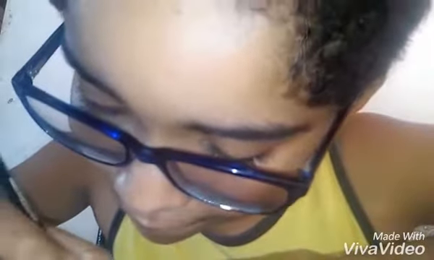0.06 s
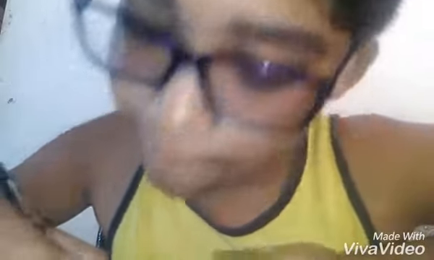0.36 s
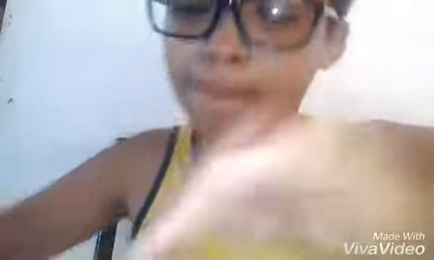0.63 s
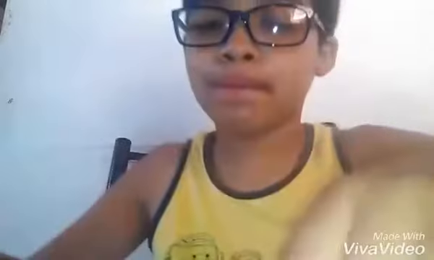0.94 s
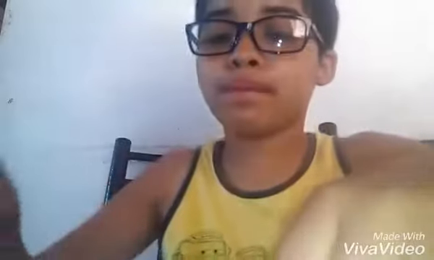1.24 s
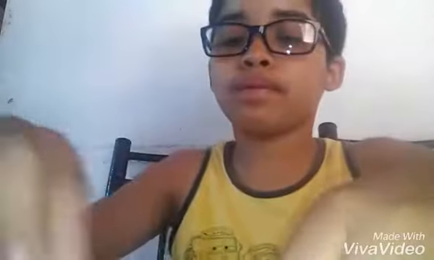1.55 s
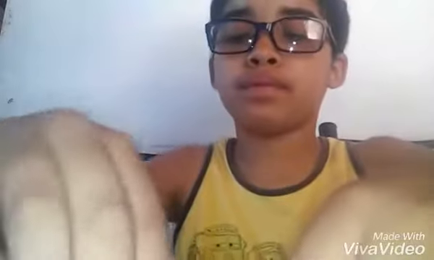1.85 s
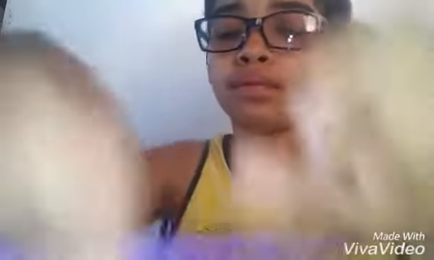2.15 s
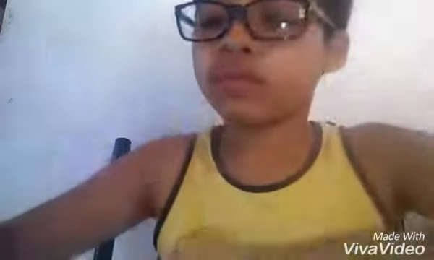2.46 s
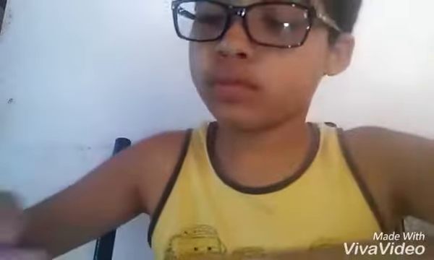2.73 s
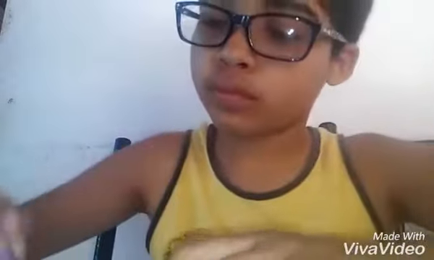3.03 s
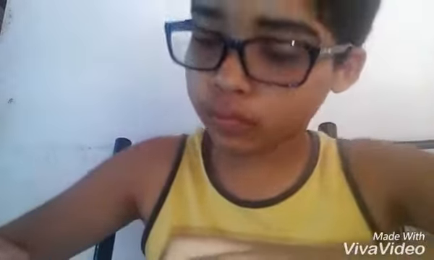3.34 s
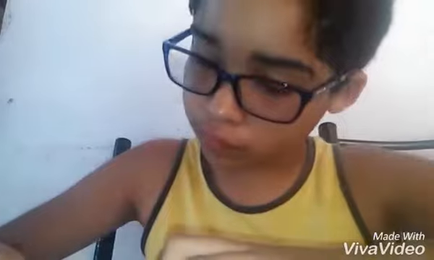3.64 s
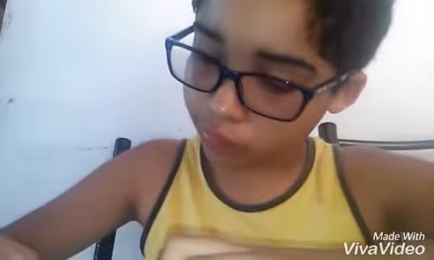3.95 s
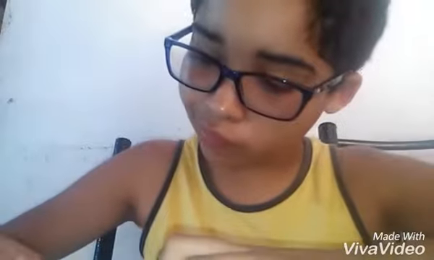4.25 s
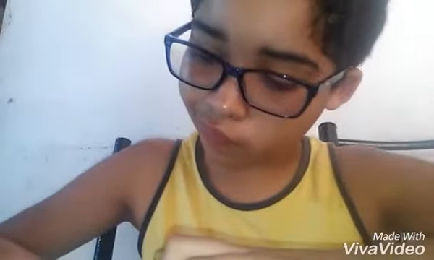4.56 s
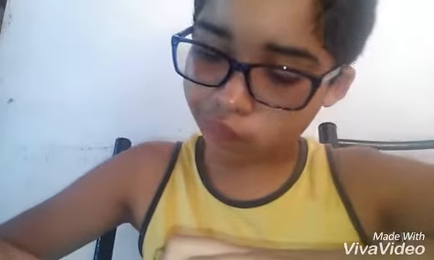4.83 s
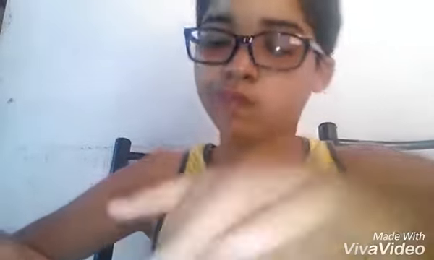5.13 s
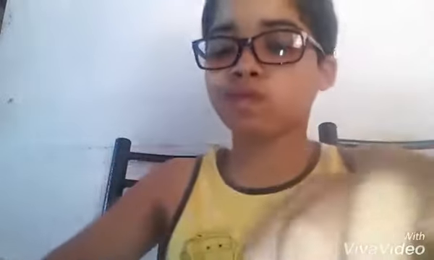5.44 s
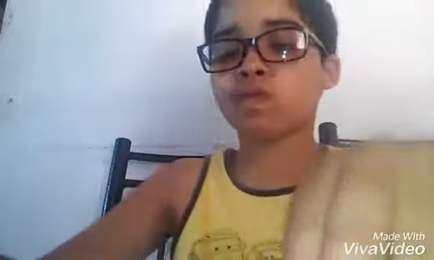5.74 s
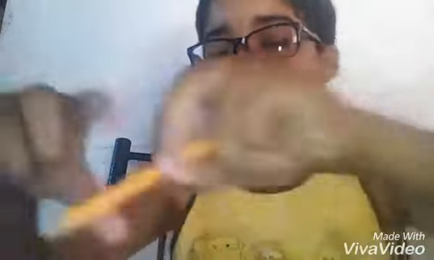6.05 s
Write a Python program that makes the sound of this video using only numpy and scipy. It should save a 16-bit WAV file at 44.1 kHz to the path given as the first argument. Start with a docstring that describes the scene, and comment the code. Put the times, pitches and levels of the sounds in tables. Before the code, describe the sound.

A small, quiet room with soft hiss and a faint electrical hum, heard from close by. For the first 0.6 seconds a fine pen tip shades paper in six quick, very faint strokes. Around 1.1 to 1.3 seconds pen barrels click against each other and the table, ending in a thin tink. Single light clicks follow at about 1.6 and 2.2 seconds. After a brief scuff and paper swish, just before 3 seconds, a pen is knocked down hard on the wooden top: a sharp, rattling crack with a low thump, far louder than anything else. It skids coarsely over the sheet, clicks at 3.1 seconds and settles. From about 3.9 to 4.7 seconds a broad tip scribbles softly to and fro four times. Small scuffs cluster around 5 seconds, then fingers tick faintly on a pen, with two light clicks near 6.3 seconds.

```python
"""Colouring pens on a table

A small, quiet room with soft hiss and a faint mains hum. Pen barrels and caps click and tink,
and tips rub over the paper fibres, first in quick shading, later in a to-and-fro scribble.
Near 3 s one pen is knocked down hard, thumps the wooden top and skids over the sheet."""
import sys
import numpy as np
from scipy import signal
from scipy.fft import rfft, irfft, next_fast_len
from scipy.io import wavfile

SR = 44100
rng = np.random.default_rng(int(sys.argv[2]) if len(sys.argv) > 2 else 0)


def transcribe(u):
    """Save the signal u as a 16-bit wav file named by the first command-line argument.

    u: samples, shape (n,) or (channels, n), limited to [-1, 1]; the rate is SR.
    q: integer samples, one column per channel.
    """
    v = np.clip(np.atleast_2d(u).T, -1, 1)
    q = np.round(v * 32767).astype(np.int16)
    wavfile.write(sys.argv[1], SR, q)


N = 277389
T = np.arange(N) / SR
HIT_T = T[:SR // 2]  # time axis of a one-shot


def from_db(db):
    """Decibels to gain."""
    return 10 ** (np.asarray(db) / 20)


def unit_rms(x):
    """Normalise to an rms of 1."""
    return x / np.sqrt(np.mean(x ** 2) + 1e-20)


def unit_peak(x):
    """Normalise to a peak of 1."""
    return x / (np.abs(x).max() + 1e-20)


def at_hz(curve, hz):
    """Read a curve along a log-frequency axis."""
    frequencies, values = np.transpose(curve)
    return np.interp(np.log(np.maximum(hz, 1)), np.log(frequencies), values)


def decay(t60, t=HIT_T):
    """An envelope that loses 60 dB in t60 seconds."""
    return np.exp(-np.log(1000) * t / t60)


def swell(s, half_s, db):
    """A bell-shaped fade in and out, centred on time s."""
    return from_db(db) * np.exp(-.5 * np.minimum(((T - s) / half_s) ** 2, 100))


def fader(curve):
    """Gain along a (time, level) curve, closing within milliseconds outside it."""
    s, db = np.transpose(curve)
    outside_s = np.maximum(s[0] - T, 0) + np.maximum(T - s[-1], 0)
    return from_db(np.interp(T, s, db)) * np.exp(-outside_s / 0.002)


def drift(rate):
    """Random modulation that glides to `rate` new values a second."""
    knots = rng.standard_normal(N // 8)
    return np.interp(T * rate, np.arange(len(knots)), knots)


def add(out, s, sound):
    """Mix a sound in at time s."""
    start = int(s * SR)
    out[start:start + len(sound)] += sound[:N - start]


def eq(x, curve):
    """Minimum-phase EQ along a (frequency, gain) curve: nothing rings ahead of an attack."""
    size = 2 * next_fast_len(len(x) // 2 + 2048)
    gain = from_db(at_hz(curve, np.linspace(0, SR / 2, size // 2 + 1)))
    cepstrum = irfft(np.log(gain))
    cepstrum[1:size // 2] *= 2
    cepstrum[size // 2 + 1:] = 0
    return irfft(rfft(x, size) * np.exp(rfft(cepstrum)))[:len(x)]


def bands(x, count=14):
    """Split a sound into overlapping (centre frequency, band) pairs that sum back to it."""
    centres = np.geomspace(100, 14000, count)
    spectrum = rfft(x)
    hz = np.linspace(0, SR / 2, len(spectrum))
    return [(centre, irfft(spectrum * np.interp(hz, centres, weights), len(x)))
            for centre, weights in zip(centres, np.eye(count))]


def resonance(x, hz, width_hz):
    """A two-pole resonator with unity gain at its peak."""
    radius = np.exp(-np.pi * width_hz / SR)
    feedforward = np.array([1, 0, -1]) * (1 - radius ** 2) / 2
    feedback = [1, -2 * radius * np.cos(2 * np.pi * hz / SR), radius ** 2]
    return signal.lfilter(feedforward, feedback, x + 1e-18)


def narrow_noise(hz, width_hz):
    """Rubbing noise held in one resonance."""
    band = resonance(rng.standard_normal(N), hz, width_hz)
    return unit_rms(resonance(band, hz, width_hz))


def friction(curve, grain_db, grains_per_s):
    """Rough, rubbing texture: noise whose strength jumps from grain to grain."""
    grains = rng.standard_normal(N) * from_db(grain_db * drift(grains_per_s))
    return unit_rms(eq(grains, curve))


def struck(modes):
    """The free ring of a struck object: one decaying sine per mode."""
    return sum(from_db(db) * np.sin(2 * np.pi * hz * HIT_T) * decay(t60) for hz, db, t60 in modes)


# Tone of the quiet room: (frequency [Hz], gain [dB])
HISS_EQ = [(20, -7), (35, -12.5), (70, -14.5), (130, -17.5), (200, -17.5), (320, -21), (950, -21.5),
           (2200, -23), (3500, -21), (6200, -21), (9500, -23), (12000, -26), (15500, -29.5)]

def room_hiss(level_db=-76.5, waver_db=0.4):
    """A bed of soft hiss that wavers band by band."""
    noise = from_db(level_db) * unit_rms(eq(rng.standard_normal(N), HISS_EQ))
    return sum(band * from_db(waver_db * drift(9)) for _, band in bands(noise))


# Faint swells of narrow hiss: (centre time [s], half length [s], level [dB], mid-glide pitch [Hz])
HISS_SWELLS = [(.42, 0.049, -82, 4250), (.58, 0.071, -80, 3040), (1.148, 0.13, -81.5, 3130),
               (1.423, .06, -78, 3170), (1.718, .05, -84, 3000), (2.52, 0.13, -80.5, 2800),
               (3.16, 0.049, -66, 2845), (3.62, .18, -83.5, 4150), (4.77, .04, -79.5, 3000),
               (5.08, .05, -80.5, 2950), (5.25, .08, -80.5, 4050)]

def sinking_hiss(half_width_hz=280, octaves_per_half=0.089):
    """A narrow band of hiss comes and goes, gliding down each time."""
    lowpass = signal.butter(2, half_width_hz, fs=SR, output="sos")
    noise = unit_rms(signal.sosfilt(lowpass, rng.standard_normal(N)))
    carriers = np.zeros(N)
    for s, half_s, db, hz in HISS_SWELLS:
        glide_hz = hz * 2 ** (-octaves_per_half * np.clip((T - s) / half_s, -3, 3))
        carriers += swell(s, half_s, db) * np.sqrt(2) * np.sin(2 * np.pi * np.cumsum(glide_hz) / SR)
    return noise * carriers


# Slow fader ride on the hum, ahead of its trim: (time [s], level [dB])
HUM_RIDE = [(0, -80.5), (1.3, -85), (1.8, -82), (2.7, -79.5), (3.6, -82), (4.5, -84.5), (5.6, -85.5),
            (6.05, -82), (6.29, -83)]

def mains_hum(hz=120, octave_db=-24, trim_db=1.5, waver_db=3.5, duck_db=-11, duck_half_s=0.018):
    """A wavering mains hum with a faint octave, ducking briefly at each pen stroke."""
    strokes = scribble_strokes() + shading_strokes()
    ducking = sum(swell(s, duck_half_s, 0) for s, _, _ in strokes)
    phase = 2 * np.pi * hz * T
    tone = unit_rms(np.sin(phase) + from_db(octave_db) * np.sin(2 * phase))
    return tone * fader(HUM_RIDE) * from_db(trim_db + duck_db * ducking + waver_db * drift(16))


# Reverb time of the small room: (frequency [Hz], t60 [s])
REVERB_TIMES = [(120, 0.66), (300, 0.45), (4000, .36), (12000, 0.24)]

def room_reverb(x, predelay_s=.011):
    """Dense wall echoes arrive after a short gap; the treble dies first."""
    t = T[:SR]
    tail = sum(band * decay(at_hz(REVERB_TIMES, hz), t) for hz, band in bands(rng.standard_normal(SR)))
    tail *= t > predelay_s
    return signal.fftconvolve(x, tail / np.sqrt(np.sum(tail ** 2)))[:N]


def room_boom(hz=120.3, level_db=-52, rise_s=.02, t60=0.88):
    """The knock wakes a low room mode that blooms and dies slowly."""
    knock_s = KNOCK_HITS[0][0]
    t = np.maximum(T - knock_s, 0)
    envelope = (1 - np.exp(-t / rise_s)) * decay(t60, t)
    return from_db(level_db) * envelope * np.sin(2 * np.pi * hz * t)


# Light touches on paper and table: (centre time [s], half length [s], level [dB], pitch [Hz])
BRUSH_CUES = [(0.823, 0.031, -75, 7000), (0.93, 0.045, -74.5, 5030), (1.007, .046, -85.5, 153),
              (1.173, 0.0094, -60.5, 1140), (1.205, 0.011, -69, 3400), (1.176, 0.033, -73.5, 216),
              (1.545, .037, -78.5, 1220), (1.958, 0.032, -75.5, 7100), (2.042, 0.015, -77, 1240),
              (5.37, 0.023, -77.5, 940), (5.68, 0.097, -78, 6960), (5.718, .018, -80.5, 1140),
              (5.951, 0.068, -79, 129.7), (5.966, 0.02, -79.5, 890)]

def brushes(relative_width=0.64):
    """Hands and pens rub softly, each time in the resonance of the thing touched."""
    return sum(swell(s, half_s, db) * narrow_noise(hz, relative_width * hz)
               for s, half_s, db, hz in BRUSH_CUES)


def shading_strokes(count=6, start_s=0.048, step_s=0.1043, half_s=.026, db=-75.5):
    """Quick, even strokes of the fine tip, as (time, half length, level)."""
    return [(start_s + k * step_s, half_s, db) for k in range(count)]


def scribble_strokes(count=4, start_s=3.895, cycle_s=.217, return_after_s=.085):
    """Short pushes and longer, light returns of the broad tip, as (time, half length, level)."""
    strokes = []
    for k in range(count):
        s = start_s + k * cycle_s
        push_db = min(-71 + 5.5 * k, -62)  # harder each time, up to full pressure
        strokes += [(s, .014, push_db), (s + return_after_s, 0.022, -73.5)]
    return strokes


# Rasp of each tip as paper fibres catch and let go: (frequency [Hz], gain [dB])
BROAD_TIP_EQ = [(200, -8), (650, -19.5), (1050, -4.5), (1400, -8.5), (2700, -10), (4000, 3), (5500, 1.5),
                (8500, -4.5), (12000, -23.5), (16000, -39)]
FINE_TIP_EQ = [(200, -28), (700, -25), (960, 1), (1300, -20), (4300, -23), (5500, 3), (7000, -6),
               (8500, -1), (9800, -12.5), (16000, -24)]

def colouring(table_hz=970, table_width_hz=170, table_db=-15):
    """Each stroke swells and fades with the speed of the tip; the table top sings faintly along."""
    broad_envelope = sum(swell(*stroke) for stroke in scribble_strokes())
    fine_envelope = sum(swell(*stroke) for stroke in shading_strokes())
    broad = broad_envelope * friction(BROAD_TIP_EQ, grain_db=3.5, grains_per_s=500)
    fine = fine_envelope * friction(FINE_TIP_EQ, grain_db=3.5, grains_per_s=970)
    table = (broad_envelope + fine_envelope) * narrow_noise(table_hz, table_width_hz)
    return broad + fine + from_db(table_db) * table


# Tone of the chatter and of a clattering barrel: (frequency [Hz], gain [dB])
CLATTER_EQ = [(100, -28), (250, -19), (600, -22), (1000, -3.5), (1600, -0.5), (2400, -6.5), (4000, 3.5),
              (6500, -1), (9000, -9), (12000, -24.5), (16000, -36)]

def chatter(cues):
    """Rough, grainy noise: each (time, level, t60) cue starts at once and dies away."""
    envelope = np.zeros(N)
    for s, db, t60 in cues:
        add(envelope, s, from_db(db) * decay(t60))
    return envelope * friction(CLATTER_EQ, grain_db=3, grains_per_s=980)


def fidget(start_s=4.2, end_s=6.25, ticks_per_s=22, level_db=-74.5, spread_db=1, t60=.08):
    """Fingers shift on a pen: faint ticks at random moments."""
    gap_draws, level_draws = rng.random((60, 2)).T
    times = start_s + np.cumsum(-np.log(1 - gap_draws)) / ticks_per_s
    levels = level_db + spread_db * (1 - 2 * level_draws)
    return chatter([(s, db, t60) for s, db in zip(times, levels) if s < end_s])


# Bursts of rough noise: (time [s], starting level [dB], t60 [s])
BURST_CUES = [(.688, -65, 0.033), (1.491, -67, 0.026), (2.2065, -64.5, .025), (2.8263, -51.5, .02),
              (2.831, -50, 0.055), (2.9485, -36, .2), (4.8656, -58.5, 0.032), (4.9165, -55, 0.044),
              (4.94, -58, 0.071), (4.949, -59, 0.052), (4.965, -54.5, 0.028), (5.0558, -60.5, .035),
              (5.2585, -56.5, .02), (5.703, -64.5, .025)]

def rough_bursts():
    """The loudest burst starts just ahead of the knock and fades under it; the rest are pen scuffs."""
    return chatter(BURST_CUES)


# Modes of a thin barrel: (frequency [Hz], relative level [dB], t60 [s])
THIN_BARREL_MODES = [(1596, -14.5, 0.052), (2370, -15, 0.049), (2916, -5.5, 0.047), (5440, -10, 0.028),
                     (5556, 0.5, 0.039)]

def tink(s=1.2868, peak_db=-41.5, contact_s=0.00052):
    """A loosely held barrel rings freely; two close modes beat."""
    out = np.zeros(N)
    ring = struck(THIN_BARREL_MODES) * (1 - np.exp(-HIT_T / contact_s))
    add(out, s, from_db(peak_db) * unit_peak(ring))
    return out


# Clicks of barrels and caps:
# (time [s], peak level [dB], ring pitch [Hz], ring t60 [s], clatter relative to ring [dB])
CLICK_CUES = [(1.129, -32.5, 2300, .0055, -6), (1.161, -44, 894, 0.076, 8.5), (1.184, -42, 2680, .015, 2),
              (1.6034, -36, 6700, 0.0027, -7.5), (2.1515, -35, 5780, .0033, -2.5),
              (2.2536, -48.5, 6900, 0.0066, -8), (2.2583, -44.5, 5960, 0.0048, -1),
              (2.8594, -44, 1320, .003, -5), (3.083, -30, 5530, .014, 16), (6.254, -54, 1290, .03, -1),
              (6.272, -47.5, 1940, .007, 5)]

def clicks(clatter_t60=0.018, contact_s=.0003):
    """Each sharp contact rings the touched part and sets off a brief clatter along the barrel."""
    out = np.zeros(N)
    attack = 1 - np.exp(-HIT_T / contact_s)
    for s, peak_db, hz, t60, clatter_db in CLICK_CUES:
        ring = unit_peak(np.sin(2 * np.pi * hz * HIT_T) * decay(t60) * attack)
        burst = rng.standard_normal(len(HIT_T)) * decay(clatter_t60)
        clatter = from_db(clatter_db) * unit_peak(eq(burst, CLATTER_EQ))
        add(out, s, from_db(peak_db) * unit_peak(ring + clatter))
    return out


# Modes of the wooden top: (frequency [Hz], relative level [dB], t60 [s])
WOOD_MODES = [(185, -1, 0.063), (234.2, -2, 0.087), (320, -4, .06), (470, -7, 0.093), (1016, 5, .04)]
# Blows that reach the wood: (time [s], peak level [dB])
THUD_CUES = [(1.129, -51.5), (1.1585, -63), (2.958, -28)]

def thuds(low_cut_hz=150):
    """The table top answers the heavier blows with a low wooden note that carries little deep bass."""
    out = np.zeros(N)
    low_cut = signal.butter(3, low_cut_hz, "high", fs=SR, output="sos")
    note = unit_peak(signal.sosfilt(low_cut, struck(WOOD_MODES)))
    for s, peak_db in THUD_CUES:
        add(out, s, from_db(peak_db) * note)
    return out


# Resonances of pen and table top: (frequency [Hz], bandwidth [Hz], gain [dB])
BODY_MODES = [(490, 90, -5), (990, 170, -2), (3510, 66, 5), (3680, 36, 6), (4870, 12, 13.5),
              (4970, 16, 9.5), (6100, 27, 12), (6300, 33, 7.5), (6330, 16, 9), (6590, 14, 10),
              (6720, 15, 12.5), (7590, 20, 8.5), (7430, 26, 9)]

def body_ring(x):
    """Pen and table top ring along with whatever shakes them."""
    return sum(from_db(db) * resonance(x, hz, width_hz) for hz, width_hz, db in BODY_MODES)


# Fader rides on the sheet, before the knock and after the skid, ahead of trim: (time [s], level [dB])
PUSH_RIDE = [(2.815, -75), (2.835, -70), (2.847, -68.5), (2.941, -54.5), (2.95, -44)]
SETTLE_RIDE = [(3.12, -55), (3.128, -63), (3.204, -57), (3.246, -60.5), (3.258, -74.5),
               (3.272, -64.5), (3.34, -89.5)]
# Tone of the paper swish: (frequency [Hz], gain [dB])
SHEET_EQ = [(29, -35.5), (50, -7), (128, -5), (305, -20.5), (369, -21.5), (1610, -19.5), (2250, -18.5),
            (2600, -8.5), (4010, -13.5), (6340, -2), (9100, -8.5), (14000, -27.5), (15800, -33)]

def sheet_swish(trim_db=1.5):
    """The sheet swishes lightly as the pen is pushed over it, and again as the pen settles."""
    envelope = from_db(trim_db) * (fader(PUSH_RIDE) + fader(SETTLE_RIDE))
    return envelope * friction(SHEET_EQ, grain_db=2.5, grains_per_s=2400)


# Fader ride on the skid: (time [s], level [dB])
SKID_RIDE = [(2.978, -33.5), (3.052, -40), (3.076, -49), (3.082, -48), (3.11, -79)]
# Tone of the scrape: (frequency [Hz], gain [dB])
SKID_EQ = [(29, -36.5), (50, -14), (207, -9), (388, -19.5), (530, -8.5), (643, -20.5), (968, -10.5),
           (1360, -13.5), (1640, -8.5), (1990, -12.5), (2790, -7.5), (3310, -8.5), (4860, -2), (8670, -7.5),
           (15800, -33.5)]

def skid(body_db=-5):
    """The knocked pen skids on with a coarse scrape that rings pen and table."""
    scrape = friction(SKID_EQ, grain_db=2.0, grains_per_s=1200)
    return fader(SKID_RIDE) * unit_rms(scrape + from_db(body_db) * body_ring(scrape))


def squeak():
    """The pen catches for a moment late in its skid."""
    return swell(s=3.049, half_s=.007, db=-49) * narrow_noise(hz=1614, width_hz=220)


# The pen lands end after end: (time [s], attack rms [dB], bright edge [Hz], rattle t60 [s])
KNOCK_HITS = [(2.9565, -22, 8500, 0.026), (2.9586, -17, 4893, 0.019), (2.9632, -22.5, 6500, .011),
              (2.9653, -21, 3600, 0.029)]
# Tone of the rattle: (frequency [Hz], gain [dB])
KNOCK_EQ = [(40, -36), (90, -24.5), (200, -13), (350, -17), (500, -13), (720, -21.5), (1020, -8.5),
            (1300, -18), (2000, -9), (2600, -17), (3500, -12), (5000, -12), (8000, -12.5), (10500, -13.5),
            (12500, -25.5), (15800, -36.5)]

def knock(edge_width_hz=2000, edge_db=11, attack_s=.004):
    """Four hard contacts within ten milliseconds, each a dying rattle that rings pen and table."""
    out = np.zeros(N)
    for s, attack_db, edge_hz, t60 in KNOCK_HITS:
        rattle = eq(rng.choice([-1, 1], len(HIT_T)) * decay(t60), KNOCK_EQ)
        edge = from_db(edge_db) * resonance(rattle, edge_hz, edge_width_hz)
        hit = rattle + body_ring(rattle) + edge
        attack_rms = np.std(hit[:int(attack_s * SR)])
        add(out, s, from_db(attack_db) * hit / attack_rms)
    return out


def scene(reverb_db=-15.5):
    """Mono mix: everything on the table feeds the reverb, over a bed of hiss and hum."""
    foley = clicks() + rough_bursts() + fidget() + tink() + thuds()
    foley += knock() + skid() + sheet_swish() + squeak()
    foley += colouring() + brushes()
    room = from_db(reverb_db) * room_reverb(foley) + room_boom()
    bed = room_hiss() + sinking_hiss() + mains_hum()
    return (foley + room + bed)[None]


def record(dry, high_cut_hz=15600, dc_offset=-0.00034):
    """A steep high cut; the microphone rests slightly off zero."""
    high_cut = signal.ellip(10, .1, 70, high_cut_hz, fs=SR, output="sos")
    return signal.sosfilt(high_cut, dry) + dc_offset


dry = scene()
out = record(dry)
transcribe(out)
```